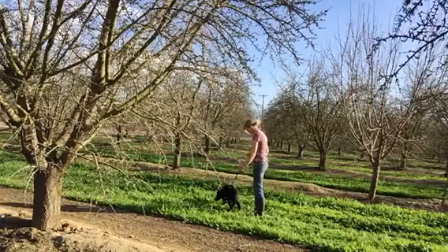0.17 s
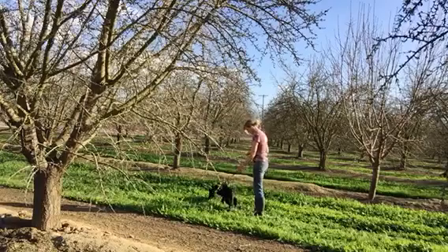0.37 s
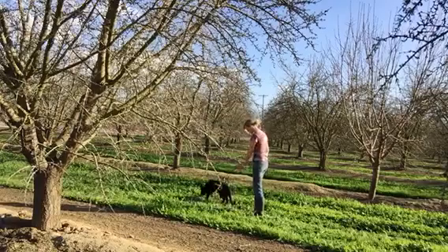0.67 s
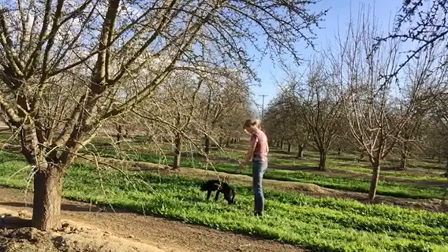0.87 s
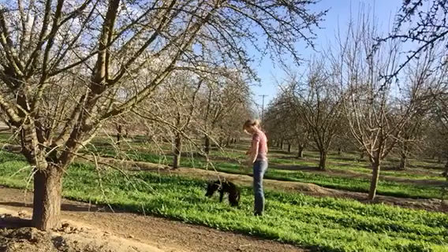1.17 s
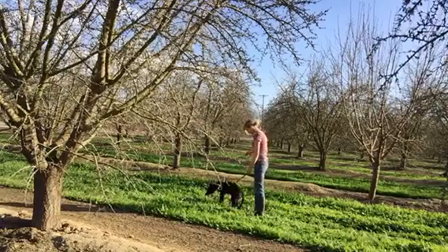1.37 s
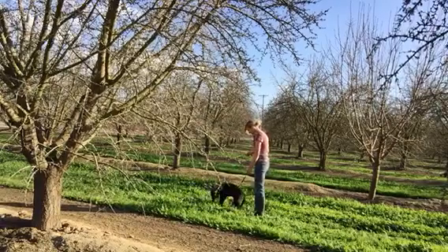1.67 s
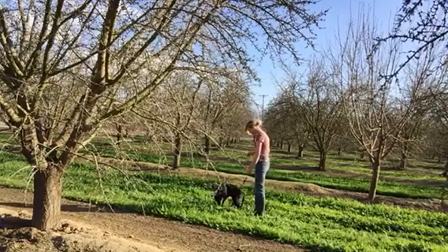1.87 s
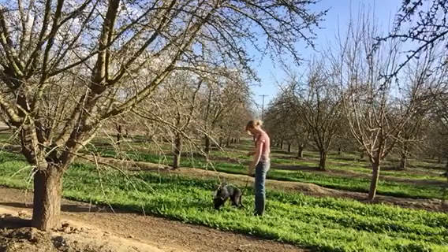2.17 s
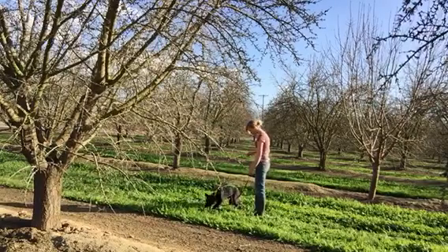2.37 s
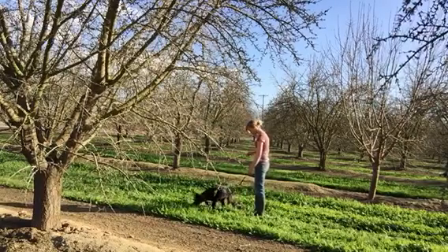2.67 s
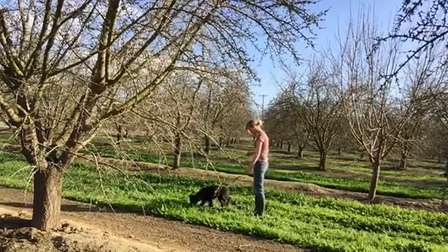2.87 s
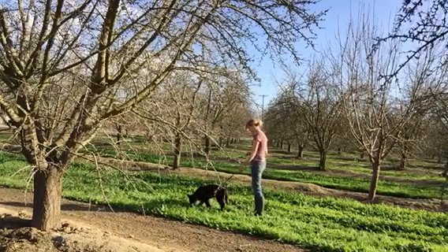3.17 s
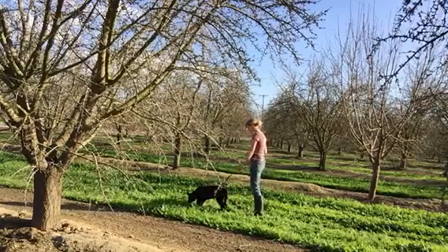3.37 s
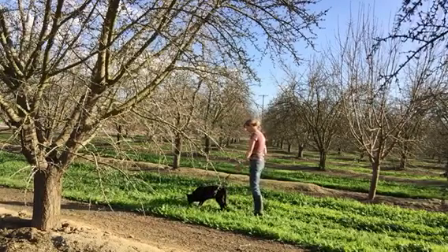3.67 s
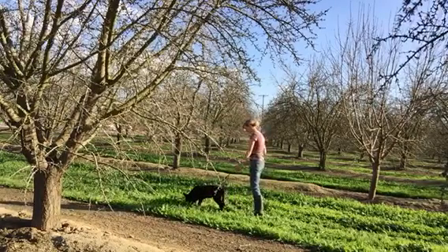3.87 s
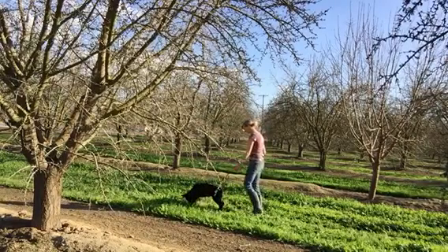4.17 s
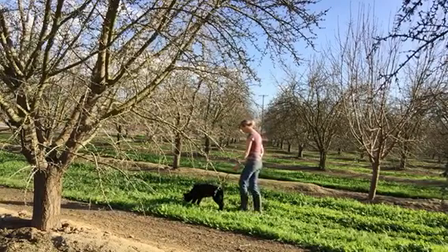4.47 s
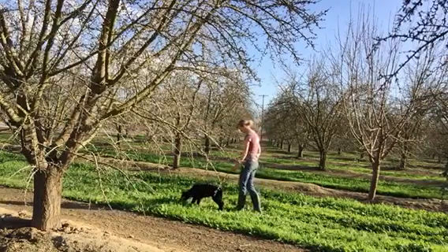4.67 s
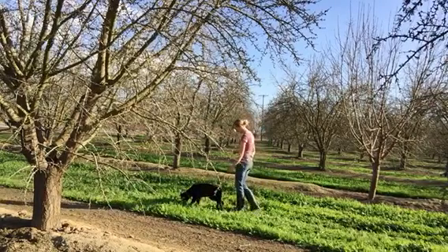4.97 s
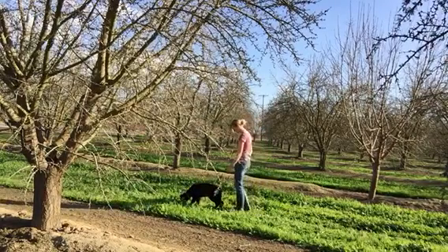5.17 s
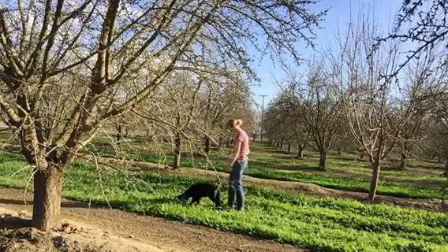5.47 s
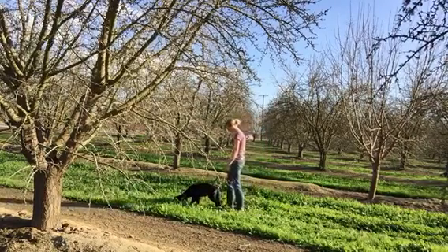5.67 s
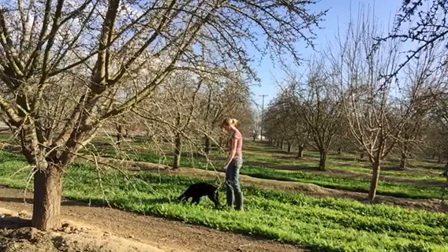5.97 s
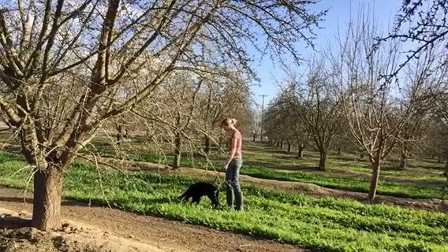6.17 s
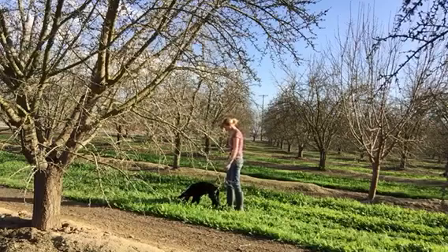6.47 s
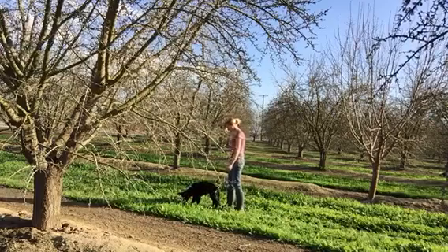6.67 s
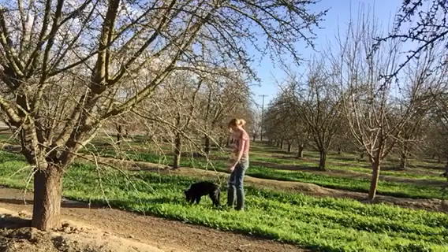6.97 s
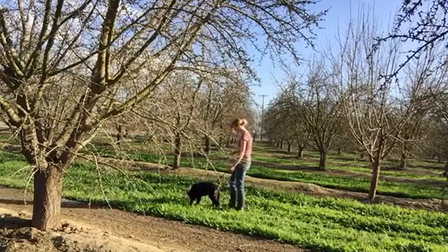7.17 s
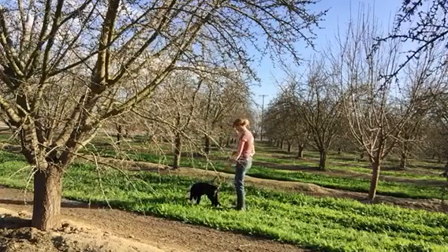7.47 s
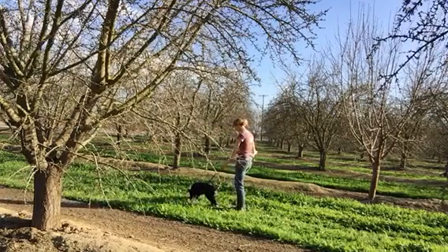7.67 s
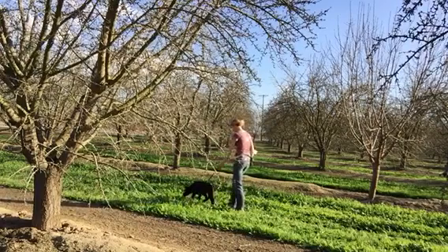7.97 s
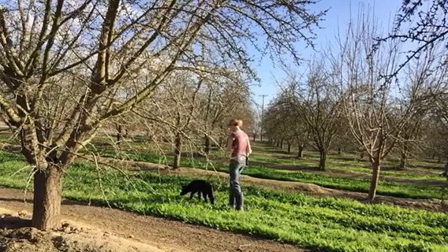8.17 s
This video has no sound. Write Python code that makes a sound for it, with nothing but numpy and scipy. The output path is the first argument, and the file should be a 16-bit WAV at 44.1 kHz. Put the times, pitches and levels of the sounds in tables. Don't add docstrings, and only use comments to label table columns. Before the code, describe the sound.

A distant vehicle drives past an open orchard, its smooth exhaust hum dropping at a gear change, tyres roaring in patches, faint birds and wind.

```python
import sys
import numpy as np
from scipy import signal
from scipy.io import wavfile

SR = 44100
rng = np.random.default_rng(int(sys.argv[2]) if len(sys.argv) > 2 else 0)


def boost_factor(decibels):
    exponent = np.asarray(decibels, float) / 20
    return 10 ** exponent


def waveform_to_disk(signal):
    frames = np.transpose(np.atleast_2d(signal))
    scaled = np.clip(frames, -1, 1) * 32767
    samples = np.round(scaled).astype(np.int16)
    wavfile.write(sys.argv[1], SR, samples)


N = 366206
STEP = 40
SLOW_S = np.arange(N // STEP + 2) * STEP / SR


def rms_one(x):
    return x / np.sqrt(np.mean(x ** 2) + 1e-20)


def in_time(rows):
    s, *columns = np.transpose(rows)
    return np.array([np.interp(SLOW_S, s, column) for column in columns])


def full_rate(slow):
    return np.interp(np.arange(N) / STEP, np.arange(len(slow)), slow)


def at_hz(points, hz):
    curve_hz, value = np.transpose(points)
    return np.interp(np.log(hz), np.log(curve_hz), value)


def drift(rate_hz):
    r = np.exp(-2 * np.pi * STEP * rate_hz / SR)
    settle = 2000
    noise = rng.standard_normal(len(SLOW_S) + settle)
    return rms_one(signal.lfilter([1], [1, -2 * r, r * r], noise)[settle:])


def swell(middle_s, half_s, edge=2):
    return np.exp(-np.abs((SLOW_S - middle_s) / half_s) ** edge)


def bandpass(x, order, low_hz, high_hz):
    return signal.sosfilt(signal.butter(order, [low_hz, high_hz], "band", fs=SR, output="sos"), x)


# time in seconds, rate in Hz.
FIRING = [(0, 169.8), (.6, 174), (1, 176), (1.32, 177.3), (1.44, 173), (1.68, 157), (1.84, 146.5),
          (1.95, 145.5), (2.35, 137.4), (3, 134.4), (3.7, 133.7), (4.4, 134), (6, 137.4), (7.65, 142.3),
          (8.04, 142.6), (8.15, 138.6), (8.22, 132.4), (8.31, 127.5)]
# time in seconds, level in dB.
HUM = [(0.0, -40), (0.16, -38), (0.28, -42.5), (0.3, -38), (1.02, -29.5), (1.38, -34.5), (1.66, -24),
       (2.01, -28.5), (2.06, -30), (2.29, -22.5), (3.17, -25.5), (3.33, -23), (4.76, -24), (5.73, -27.5),
       (7.03, -28.5), (7.7, -31), (7.86, -34), (8.3, -33.5)]
ORDERS = (.75, 1.25, 1.5, 2)
# dB re hum while pulling, dB re hum after the throttle lifts,
# swell middle in seconds, swell half length in seconds, swell in dB.
ORDER_LEVELS = [
    (-17, -29, 1.45, .38, 20),
    (-25.5, -38.5, 1.8, 0.28, 9.5),
    (-39.5, -27, 3.4, 1, 4.5),
    (-21.5, -35.5, 3.1, .6, 13),
]
# time in seconds, waver in radians per order.
WAVER = [(0, 1.3), (1.4, 1.3), (2.4, .6), (4.2, .6), (5.5, 1.1), (8.3, 1.3)]


def exhaust():
    firing_hz, hum_db = in_time(FIRING)[0], in_time(HUM)[0]
    waver_rad = in_time(WAVER)[0]
    lift_s, lift_takes_s = 1.05, 0.25
    pull = 0.5 - 0.5 * np.tanh((SLOW_S - lift_s) / lift_takes_s)
    turns = np.cumsum(full_rate(firing_hz)) / SR
    level = full_rate(boost_factor(hum_db + 0.5 * drift(6.0) + 0.14 * drift(35.0)))
    jitter_rad = full_rate(0.046 * drift(23.0))
    out = level * np.sin(2 * np.pi * turns + jitter_rad)
    for order, (pull_db, lifted_db, middle_s, half_s, swell_db) in zip(ORDERS, ORDER_LEVELS):
        level_db = hum_db + lifted_db + pull * (pull_db - lifted_db)
        level_db = level_db + swell_db * swell(middle_s, half_s) + 3.0 * drift(6.0)
        phase = 2 * np.pi * order * turns + full_rate(waver_rad * order * drift(4))
        out += full_rate(boost_factor(level_db)) * np.sin(phase)
    return np.sqrt(2) * out


def bands(colour, count):
    white = rng.standard_normal((2, N + SR // 4))
    edges = np.geomspace(colour[0][0], min(colour[-1][0], 0.45 * SR), count + 1)
    for k, (low_hz, high_hz) in enumerate(zip(edges, edges[1:])):
        hz = np.sqrt(low_hz * high_hz)
        band = bandpass(white[k % 2], 3, low_hz, high_hz)
        yield hz, boost_factor(at_hz(colour, hz)) * band[-N:]


# time in seconds, nearness in dB, brightness in dB per octave.
PASS = [(0, -1.5, 3.5), (1.2, 0, 4), (1.75, -1.5, 1), (2.1, 5, 0), (2.5, 5, 0.5), (2.8, 2.5, -1.5),
        (3.6, 4, -6), (4.3, 4, -2), (5, -1.5, -4), (5.6, -3.5, -5), (6, -8, -2.5), (7, -11.5, -3),
        (8.3, -15, -2.5)]
# frequency in Hz, share of the pass it follows.
FOLLOWS = [(100, .15), (230, .75), (800, 0.97), (1700, 1.21), (3400, 1.25), (6000, 0.56), (12000, 0.47)]
# middle in seconds, half length in seconds,
# centre in Hz, width in octaves, gain in dB.
GAPS = [(0.348, 0.37, 332, 0.23, 6.5), (0.499, 0.57, 1723, .35, 4.5), (1.38, 0.22, 331, .6, -4),
        (1.55, 0.22, 107.7, .6, 3.5), (2.3, 0.37, 788, .7, 11.5), (2.25, 0.46, 6450, .8, 13),
        (2.09, 0.048, 10070, 0.98, 9), (2.24, .035, 11420, .6, 8.5), (2.358, 0.065, 11390, 0.64, 8.5),
        (2.55, 0.037, 7040, .9, 4.5), (2.74, .03, 5540, .6, 5.5), (2.85, 0.039, 5520, .6, 6.5),
        (3.2, 0.2, 2414, .7, 7.5), (3.14, .27, 4220, 0.53, 9), (3.095, 0.38, 738, .5, 3.5),
        (3.95, .12, 6000, .6, 7.5), (4.46, 0.061, 4000, .5, 7), (5.19, 0.71, 1650, .45, 6),
        (5.805, .8, 2435, 0.23, -5), (5.8, .25, 332, 0.6, 2), (6.4, 0.24, 1586, .4, 7.5),
        (6.773, .17, 947, .3, 7.5), (7.15, .1, 1218, .3, 7), (8.2, .1, 900, .4, 3)]


def passing_db(hz):
    near_db, tilt_db = in_time(PASS)
    octaves = np.clip(np.log2(hz / 1500), -0.49, 0.49)
    db = at_hz(FOLLOWS, hz) * (near_db + tilt_db * octaves)
    for middle_s, half_s, gap_hz, width_octaves, gap_db in GAPS:
        share = np.exp(-(np.log2(hz / gap_hz) / width_octaves) ** 2)
        db = db + gap_db * share * swell(middle_s, half_s, edge=2.2)
    return db - db.mean()


# time in seconds, centre in Hz, depth in dB.
GROUND = [
    (0, 546, 16.5),
    (1.3, 527, 5.5),
    (1.8, 500, 0.5),
    (4.25, 700, 3),
    (4.7, 713, 14.5),
    (5.3, 684, 17.5),
    (6.6, 674, 12.5),
    (8.3, 595, 6.5),
]


def moving_noise(colour, level_db, patchy_db, patch_rate_hz, count):
    dip_hz, depth_db = in_time(GROUND)
    ground_octaves = 0.32
    trunk_hz = 3040
    trunks_db = 1.5 * drift(9.0)
    out, steady = 0, 0
    for hz, band in bands(colour, count):
        dip_db = depth_db * np.exp(-(np.log2(hz / dip_hz) / ground_octaves) ** 2)
        flicker_db = trunks_db * hz / (hz + trunk_hz) + patchy_db * drift(patch_rate_hz)
        out = out + band * full_rate(boost_factor(passing_db(hz) - dip_db + flicker_db))
        steady = steady + band
    return boost_factor(level_db) * out / np.std(steady)


# frequency in Hz, level in dB per Hz.
RUMBLE_COLOUR = [(55, -19.5), (75, -1), (100, -2), (150, 2), (210, -6.5), (300, -8.5), (420, -13.5),
                 (560, -24), (750, -42)]


def exhaust_rumble():
    return moving_noise(RUMBLE_COLOUR, level_db=-44, patchy_db=2.0, patch_rate_hz=6.0, count=13)


# frequency in Hz, level in dB per Hz.
TYRE_COLOUR = [(420, -16), (550, 1), (800, -0.5), (1050, -1.5), (1500, -3), (2000, -6.5), (2700, -14.5),
               (4300, -25), (5000, -28), (6800, -30), (8200, -40.5), (11000, -49), (14500, -55)]


def tyres():
    return moving_noise(TYRE_COLOUR, level_db=-53, patchy_db=1.86, patch_rate_hz=11.0, count=24)


# middle in seconds, half length in seconds, level in dB.
GUSTS = [(0.408, 0.23, -65), (1.3, 0.22, -62), (2.51, 0.072, -49), (3.051, .08, -44.5), (3.27, 0.072, -44),
         (3.667, 0.21, -44.5), (4.08, 0.12, -47.5), (4.313, 0.045, -48.5), (4.44, .06, -44.5),
         (4.62, .07, -48), (4.8, 0.052, -42), (5.1, 0.062, -49), (5.4, 0.11, -47), (5.592, .1, -50),
         (5.898, 0.11, -48), (6.23, .08, -48), (6.484, 0.057, -50), (6.72, .08, -52), (7.0, 0.12, -52),
         (7.555, 0.25, -53.5), (8.2, .05, -60)]


def wind():
    low = bandpass(rng.standard_normal(N + SR), 2, 36, 95)[SR:]
    gusts = boost_factor(-63)
    for middle_s, half_s, db in GUSTS:
        gusts = gusts + boost_factor(db) * swell(middle_s, half_s, edge=1.5)
    return rms_one(low) * full_rate(gusts * boost_factor(3.5 * drift(11.0)))


# frequency in Hz, level in dB per Hz.
AIR_COLOUR = [(1200, -6), (2000, -2), (3200, -2.5), (4500, -4.5), (6300, -5.5), (8000, -12.5), (11000, -8),
              (15500, -18)]


def still_air():
    return boost_factor(-77.5) * rms_one(sum(band for hz, band in bands(AIR_COLOUR, count=8)))


# middle in seconds, half length in seconds, level in dB, lowest frequency in Hz.
RUSTLES = [(0.927, .015, -80.5, 6000), (0.972, 0.05, -68.5, 3300), (1.566, 0.011, -71, 5000),
           (1.621, .04, -71.5, 5000), (5.19, .01, -80.5, 9030), (5.369, 0.042, -80.5, 7000),
           (5.422, .045, -77, 7500), (5.566, .09, -80.5, 8070), (5.904, 0.05, -82, 4950),
           (7.577, 0.061, -84, 5000), (7.941, .03, -73, 3300), (8.179, 0.14, -79, 4000)]


def grass():
    out = np.zeros(N + SR)
    for middle_s, half_s, level_db, low_hz in RUSTLES:
        start, count = round((middle_s - half_s) * SR), round(2 * half_s * SR)
        spikes = boost_factor(4.3 * rng.exponential(1, SR // 2))
        crackle = bandpass(rng.standard_normal(SR // 2) * spikes, 2, low_hz, 14500)
        out[start:start + count] += boost_factor(level_db) * rms_one(crackle)[:count] * np.hanning(count)
    return out[:N]


# start in seconds, length in seconds, middle pitch in Hz, glide in Hz, level in dB.
CHIRPS = [(1.05, 0.037, 3970, -450, -61), (1.08, 0.018, 4200, 948, -63), (1.245, 0.066, 3790, 299, -67.5),
          (1.338, .02, 3850, 498, -64), (3.724, .021, 6020, -380, -70), (4.1, .045, 6860, 44, -73),
          (4.198, 0.05, 6700, 181, -83), (4.861, .03, 4000, 499.5, -71), (5.199, .02, 5820, 651, -65),
          (6.19, 0.027, 3690, -49, -71), (6.26, 0.032, 3700, 301, -67.5), (6.287, .03, 3920, 10, -82),
          (6.308, .02, 2560, -110, -67), (6.326, 0.038, 2980, 87, -67), (6.363, .05, 3350, 380, -78),
          (7.675, .03, 3700, -230, -68.5), (7.7, .012, 3730, 299, -76)]


def birds():
    out = np.zeros(N)
    for start_s, length_s, middle_hz, glide_hz, level_db in CHIRPS:
        start, count = round(start_s * SR), round(length_s * SR)
        pitch_hz = middle_hz + glide_hz * np.linspace(-0.5, 0.5, count)
        note = np.sin(2 * np.pi * np.cumsum(pitch_hz) / SR)
        out[start:start + count] += boost_factor(level_db) * np.hanning(count) ** 0.22 * note
    return out


def scene():
    vehicle = exhaust() + exhaust_rumble() + tyres()
    breeze = wind() + still_air()
    near = grass() + birds()
    return (vehicle + breeze + near)[None]


def top_cut(x):
    return signal.sosfilt(signal.butter(12, 15270, fs=SR, output="sos"), x)


# centre in Hz, width in Hz, gain in dB.
PORT_DIPS = [
    (5000, 720, -2),
    (8250, 370, -1),
    (10500, 650, -6.5),
]


def record(dry):
    for hz, width_hz, db in PORT_DIPS:
        peak = signal.lfilter(*signal.iirpeak(hz, hz / width_hz, fs=SR), dry)
        dry = dry + (boost_factor(db) - 1) * peak
    return top_cut(dry)


dry = scene()
out = record(dry)
waveform_to_disk(out)
```